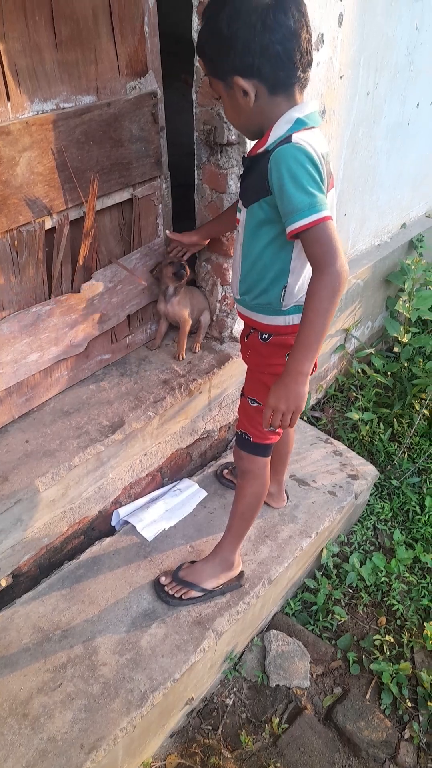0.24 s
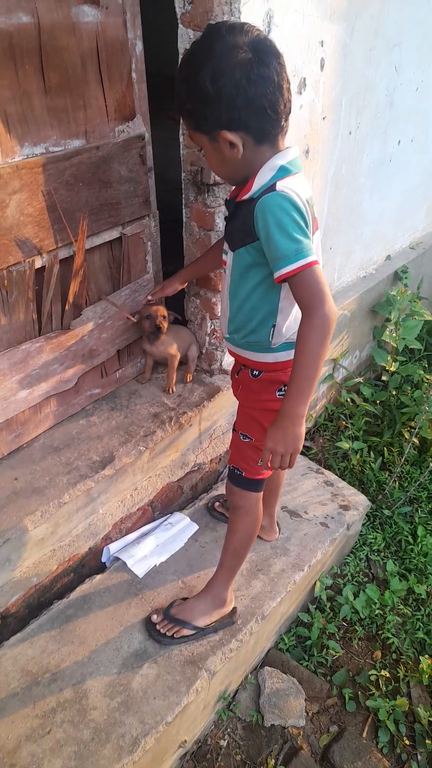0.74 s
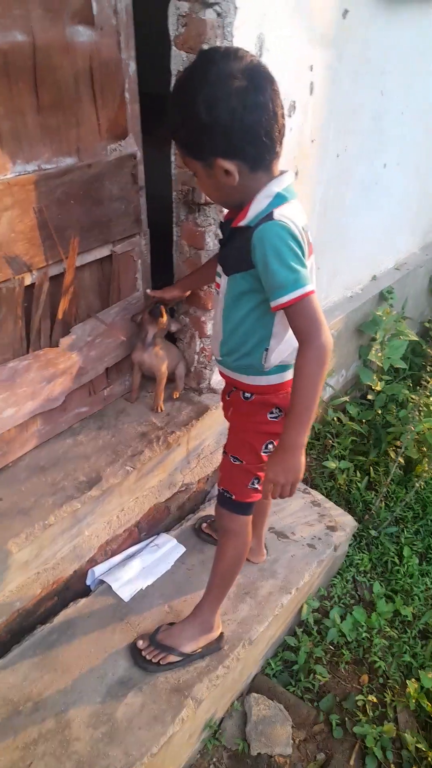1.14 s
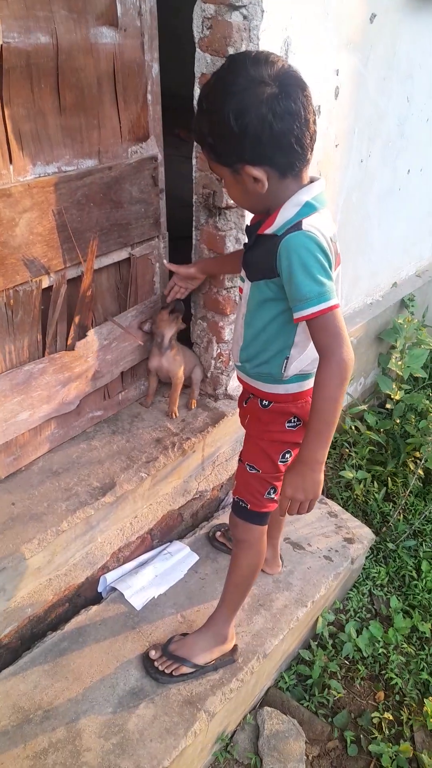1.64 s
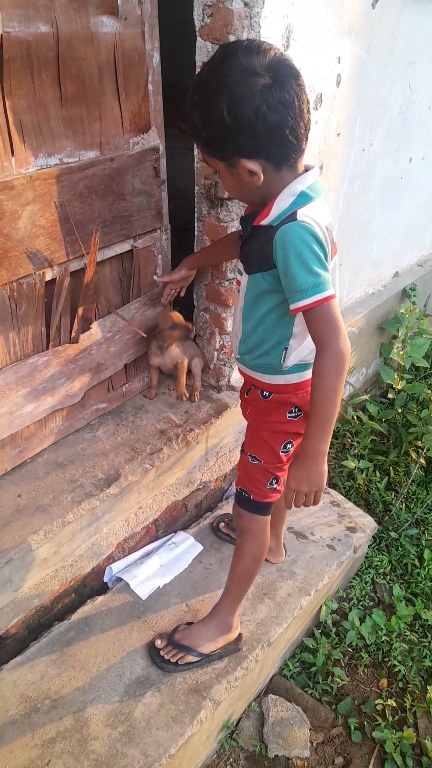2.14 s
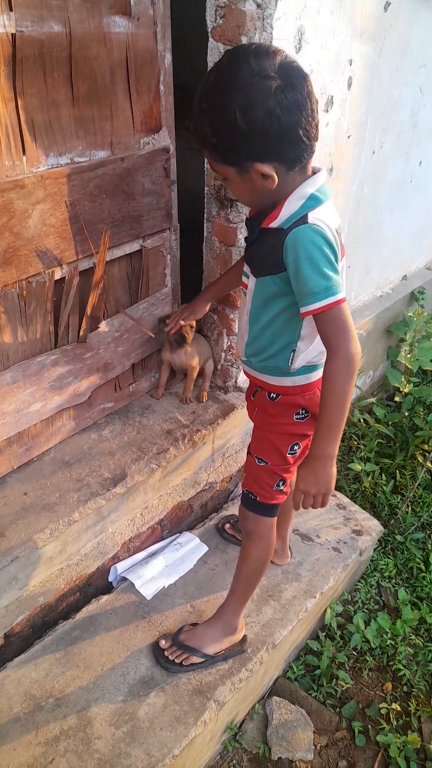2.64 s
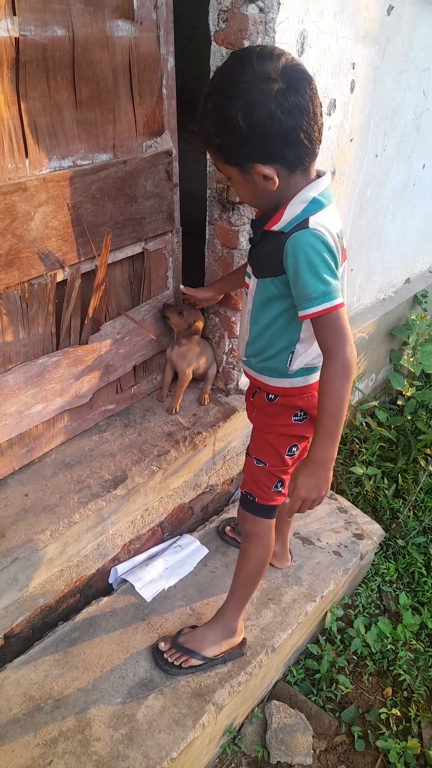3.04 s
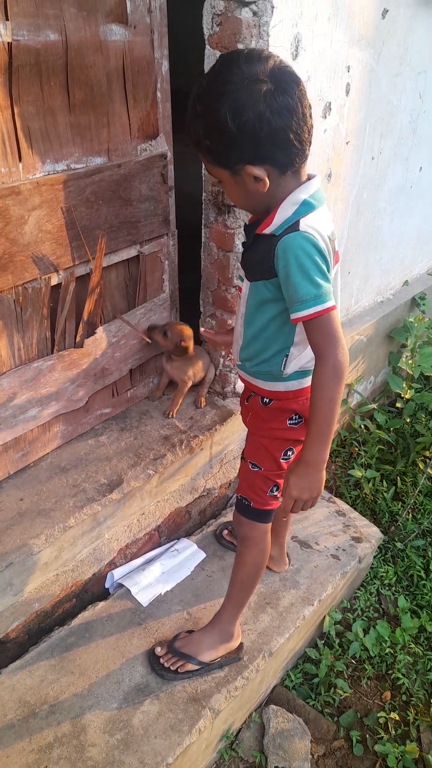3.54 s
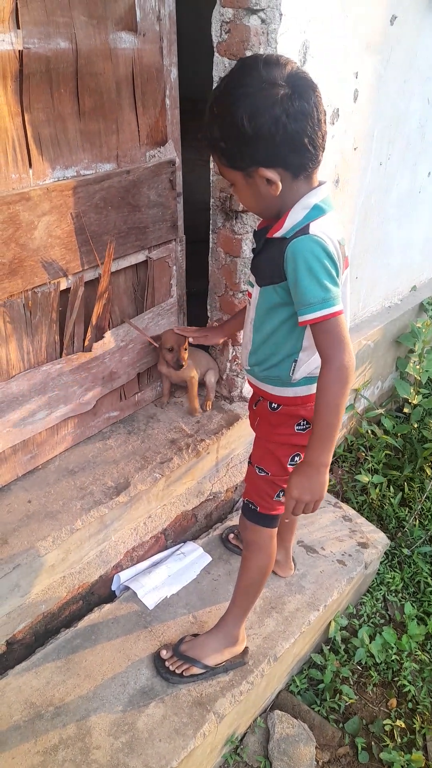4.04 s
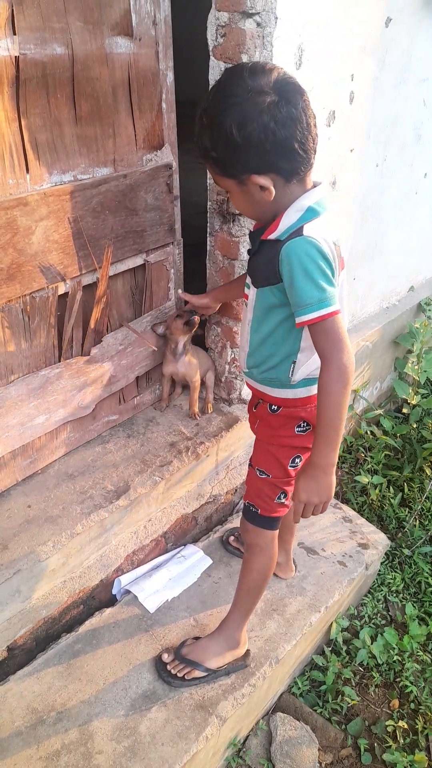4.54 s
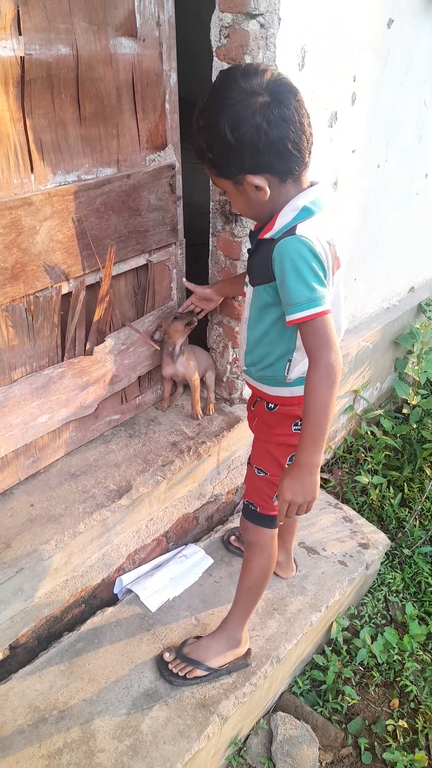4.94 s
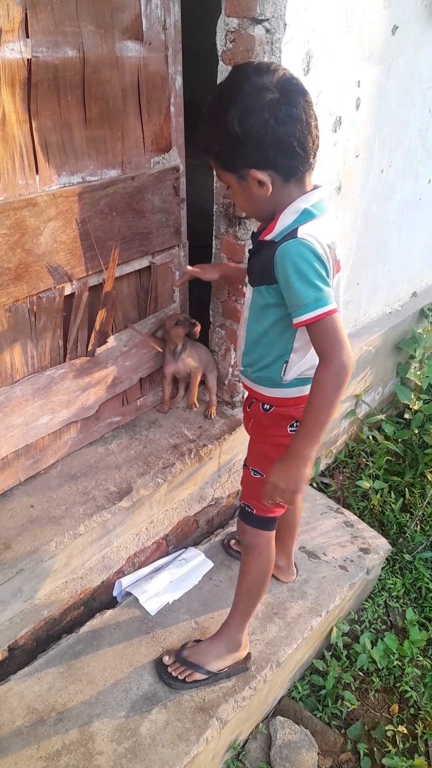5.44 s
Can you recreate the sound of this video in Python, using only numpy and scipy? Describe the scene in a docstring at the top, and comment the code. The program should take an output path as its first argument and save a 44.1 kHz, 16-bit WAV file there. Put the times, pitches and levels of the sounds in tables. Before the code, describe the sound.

Outdoors by a house doorway, about five and a half seconds. Throughout, high insects buzz and trill finely over a soft low rumble and a faint, distant, wavering drone. Within the first second come tiny, weak puppy squeaks and harsh bird chatter at a distance; quick falling chips follow between about 1.6 and 3 seconds. From 1 second the puppy whimpers regularly, each cry a thin, whistle-like whine of about a tenth of a second, bending up or down, gradually stronger. Clear, quick bird whistles sound from 3.4 to 4.2 seconds. At 4.2 the puppy gives its loudest, piercing yelp, with a hoarse catch; a short whine at 4.5 breaks into a throaty, uneven rasp until 4.8. A rising whine comes at 5, a rattling screech at 5.3, and a last strong whine near 5.55, cut off by the end. Cries and birds ring briefly off wall and doorway.

```python
"""From the start, insects buzz and trill and a faint far drone wavers over a low rumble: pulsed and shaped noise, slow tones.
Small birds soon chatter and chip as gliding tones; clear whistles join in the second half.
A small puppy then whimpers on the doorstep of a house: thin, growing cries built from partials of a gliding pitch.
Late on, one cry breaks into a rasp of uneven pulses through throat resonances, and a later one into a rattling screech.
Wall and doorway give cries and birds a short ring of decaying noise."""
import sys
import numpy as np
from scipy import signal
from scipy.fft import rfft, irfft
from scipy.io import wavfile

SR = 44100
rng = np.random.default_rng(int(sys.argv[2]) if len(sys.argv) > 2 else 0)


def waveform_to_disk(signal):
    """Save audio, clipped to [-1, 1], as 16-bit WAV at the path in sys.argv[1]."""
    frames = np.transpose(np.atleast_2d(signal))
    scaled = np.clip(frames, -1, 1) * 32767
    samples = np.round(scaled).astype(np.int16)
    wavfile.write(sys.argv[1], SR, samples)


N = 250929
TIME = np.arange(N) / SR
FREQS = np.fft.rfftfreq(N, 1 / SR) + 1e-3   # the offset keeps the logarithm finite at 0 Hz

# Outdoor rumble: (frequency [Hz], density [dB per Hz, relative])
RUMBLE_SPECTRUM = [(10, -42), (25, -24), (50, -3.5), (100, 1), (170, -5), (260, -3), (400, -18.5),
                   (540, -22), (680, -22), (900, -21.5), (1150, -21), (1400, -24.5), (1800, -35),
                   (2700, -34), (3300, -44), (6000, -80)]
RUMBLE_DB = -58.5
# Far drone, pitch: (time [s], frequency [Hz])
DRONE_PITCH = [(0, 132), (1.1, 132.4), (3.9, 141.1), (5.4, 121.9)]
# Far drone: (time [s], level [dB, before a 1.6 dB lift])
DRONE_LEVEL = [(0.0, -60), (1.06, -51.5), (1.79, -61), (2.48, -49.5), (2.71, -64), (2.82, -54),
               (3.24, -67.5), (3.88, -55.5), (4.4, -63.5), (5.6, -64.5)]
# Coherence of diffuse sound at the two ears: (frequency [Hz], left-right likeness [0-1])
EAR_LIKENESS = [(60, 0.98), (250, 0.92), (600, 0.29), (2000, 0.38), (6000, 0.069), (12000, 0.11)]
# Near insects: (time [s], buzz rate [pulses per s], buzz level [dB], trill level [dB, before a 4 dB cut])
INSECTS = [(0, 114, -101, -58), (.4, 88, -67, -58.5), (1.2, 375, -61, -57.5), (2.2, 118, -59, -56.5),
           (3, 140, -62.5, -55), (5.69, 286, -59, -54.5)]
# Distant insects: (frequency [Hz], density [dB per Hz, relative])
CHORUS_SPECTRUM = [(3400, -25.5), (4000, -11), (4700, -6.5), (5300, 0), (6200, 3.5), (6800, -20.5),
                   (7600, 0.5), (8600, 3), (9500, -6), (10700, -18.5), (11400, -14.5), (11800, -20),
                   (15700, -23.5)]
# Distant insects: (time [s], level [dB, before a 1.5 dB cut])
CHORUS_LEVEL = [(0, -58.5), (.4, -57), (1, -55), (3, -54.5), (4.3, -52), (5.69, -56)]
# Hoarse catches in the cries: (centre time [s], length [s], level [dB], throaty share [0-1])
CATCHES = [(.01, 0.056, -49, .5), (0.53, 0.043, -49, 0.56), (1.553, 0.029, -52, 0.23),
           (2.851, 0.013, -50, 0.8), (3.082, 0.016, -49.5, 0.86), (3.17, 0.18, -56.5, 0.87),
           (3.782, 0.16, -66, 0), (4.065, 0.027, -56.5, .2), (4.282, 0.09, -50, 0),
           (4.365, 0.018, -33.5, 0.6), (5.326, 0.046, -32, .05), (5.406, 0.033, -42.5, 0.4)]
# Colour of the thin hoarseness: (frequency [Hz], gain [dB])
HOARSE_SPECTRUM = [(300, -17), (800, -41), (1200, -14.5), (1700, -2), (2500, -13), (3200, -19),
                   (4300, -9.5), (5500, -40), (7200, -14.5), (9500, -30.5), (13000, -16.5), (16000, -54)]
# Throat resonances: (centre [Hz], width [Hz, before widening by 2.04],
# level with mouth nearly shut [dB], level with mouth open [dB])
THROAT = [(583, 75, 4, -14.5), (702, 180, 0, 0), (1133, 82, -3, 0.5), (1682, 160, -19, -2.5),
          (3100, 91, -18, -24), (4970, 250, -13.5, -11), (7160, 710, -8.5, -3.5), (14700, 1600, -18, -14)]
# Harsh chatter of birds further off:
# (time [s], length [s], start [Hz], middle [Hz], end [Hz], level [dB])
CHATTER = [(.33, 0.12, 2900, 2990, 2860, -66), (.66, 0.14, 2810, 2920, 2870, -66),
           (.76, .09, 3300, 3140, 2710, -59), (.87, 0.26, 3000, 2623, 2860, -54),
           (.97, 0.11, 2700, 3880, 4230, -55.5), (1.07, 0.1, 3000, 3920, 4490, -49.5),
           (1.35, 0.3, 3150, 2665, 2490, -59), (2.88, 0.25, 2700, 2630, 3140, -62.5),
           (2.98, 0.097, 3000, 3900, 4070, -56.5), (3.07, 0.1, 3200, 3810, 4300, -52),
           (3.25, 0.12, 3900, 3700, 3310, -61.5), (4.43, 0.087, 2700, 3410, 4500, -55),
           (4.53, 0.087, 3200, 3770, 4400, -53)]
# Runs of tiny falling chips, in pairs: (start [s], end [s], time between pairs [s], level [dB])
TWITTER = [(0.356, .75, 0.084, -58.5), (1.621, 2.33, 0.098, -57.5), (2.382, 2.62, .102, -52.5),
           (2.708, 3, .122, -53)]
# Clear bird whistles: (time [s], length [s], start [Hz], middle [Hz], end [Hz], level [dB])
WHISTLES = [(3.432, 0.088, 5700, 4590, 3690, -39.5), (3.606, 0.069, 3070, 4094, 3670, -40),
            (3.675, .11, 3036, 3053, 3010, -52), (3.725, 0.071, 5600, 5430, 4330, -40.5),
            (3.836, 0.073, 5780, 4270, 2660, -38.5), (3.985, 0.046, 5700, 4450, 2870, -39),
            (4.05, 0.053, 3100, 4200, 4320, -41.5), (4.136, 0.07, 3080, 3720, 2680, -43)]
# Cries; a jump of register starts a new row: (time [s], length [s], pitch turn after start [s],
# start pitch [Hz], turning pitch [Hz], end pitch [Hz], loudest moment after start [s],
# level [dB, before a 2 dB lift], swell [dB], fade [dB], then against the fundamental:
# second partial [dB], third partial [dB], upper partials [dB], extra sheen at the very top [dB])
CRIES = [(0.465, 0.041, 0.041, 718, 669, 670, 0.07, -51.5, 8, 8, -14, -21.6, -39, 0.0),
         (0.508, 0.11, 0.028, 614, 1051, 1196, 0.038, -52, -0.5, -7, -20, -40, -24.5, 16),
         (0.62, 0.04, 0.014, 1090, 1342, 1355, 0.026, -46, 10, 12, -24, -18.9, -18.9, 8),
         (0.996, 0.13, 0.1, 1160, 1050.0, 1033, 0.043, -43, 12, 5.5, -25, -25, -16, -14),
         (1.424, 0.14, 0.073, 975, 1127, 1083, 0.13, -38, 18.5, 10.5, -13.5, -29, -12, -7),
         (1.856, 0.15, 0.026, 1222, 1331, 1409, 0.19, -39.5, 10.5, 4.5, -23, -12, -3, -17),
         (2.166, 0.1, 0.0037, 1567, 1693, 1445, 0.097, -35, 14, 20, -25.5, -12, -12, -7),
         (2.462, 0.099, 0.0086, 1488, 1574, 1338, 0.083, -37, 11, 8.5, -26.5, -10, -7.5, -4.5),
         (2.733, 0.13, 0.016, 1367, 1260, 983, 0.11, -43, 10, 11, -17.8, -23.5, -8.5, -5),
         (3.038, 0.041, 0.033, 1221.0, 1360, 1510, 0.047, -42, 17, 20, -21, -13, -18, -9.0),
         (3.087, 0.11, 0.097, 1074, 1038, 1035, 0.024, -41.5, 3, 3.5, -20, -22.5, -17, -21),
         (3.357, 0.12, 0.055, 1243, 1406, 1417, 0.078, -37.5, 16.5, 0, -23, -7.5, -16.5, 5.5),
         (3.647, 0.119, 0.039, 1280, 1380, 1029, 0.061, -38, 13.5, 10.5, -21, -17, -9, -1.5),
         (3.926, 0.13, 0.047, 1318, 1501, 1265, 0.073, -35.5, 14, 6.5, -20, -2.1, -5, -7.5),
         (4.212, 0.15, 0.059, 1241, 1555, 1230, 0.053, -21, 23.5, 16, -22.5, -12, -10, -3),
         (4.505, 0.078, 0.07, 1150, 1105, 1140, 0.071, -36.5, 12.5, 18, -28.0, -19, -15, 3),
         (4.955, 0.17, 0.17, 1130, 1409, 1380, 0.13, -37.5, 8.5, -0.5, -23, -21, -7, -16.0),
         (5.268, 0.033, 0.021, 1480.0, 1636, 1560.0, 0.034, -39.0, 12, 16, -15, -6, -6, -5),
         (5.305, 0.113, 0.0353, 1600, 1741, 1482, 0.012, -29, -1, 6.5, -28.0, -9, -15.0, 6),
         (5.545, 0.18, 0.095, 1249, 1562, 1626, 0.066, -29.5, 18.5, 0, -22.5, -24.5, -13, -3)]
# Colour of the partials above the third: (frequency [Hz], gain [dB])
OVERTONES = [(3500, 10.5), (5000, -3.5), (6200, -6.5), (7400, -0.5), (8500, -21.5), (10500, -11),
             (12500, -14), (14000, -9.5), (16000, -19)]
# The voice breaks into uneven slaps: (time [s], level [dB], rate [slaps per s], mouth opening [0-1])
RASP = [(4.58, -69, 256, 0), (4.588, -37, 270, 0.5), (4.63, -32.5, 327, 0.17), (4.68, -30.5, 330, 0.34),
        (4.72, -29.5, 250, 0.93), (4.752, -29, 220, 0.95), (4.768, -49, 220, 0.95), (4.79, -41, 420, 0.3)]
# Rattle of the screech: (time [s], depth [0-1], rate [rattles per s])
SCREECH = [(5.3, 0.05, 150), (5.308, 0.87, 135), (5.336, 0.38, 197), (5.352, 0, 110)]
# Step and wall colour each ear differently:
# (frequency [Hz], left-right level [dB], left lead [radians])
EAR_COLOUR = [(503, -10.5, -3.4), (755, -2.5, 2.9), (1175, 5.5, -1.77), (1183, -3.5, -2.1),
              (1280, -2, -1.39), (1490, -10, -1.1), (1510, -3.5, -0.34), (2180, -4, 2.07), (4470, -9, 1.72),
              (8900, -4.5, 1.89)]

RISE_CURVE, FALL_CURVE = 2, 1.4   # exponents that round the pitch on either side of its turn
SWELL_CURVE, FADE_CURVE = 1.4, 1.05   # exponents on either side of the loudest moment
DROP_SHARE, DROP_S = 0.1174, 0.00708   # the pitch collapses as the air runs out
QUAVER_SHARE, QUAVER_HZ = 0.0054, 29.5   # slow unsteadiness of the pitch
# A resonance that the second partial of the low cries sweeps through
NASAL_HZ, NASAL_WIDTH_HZ, NASAL_DB = 1882, 340, 13
BRIGHT_PER_EFFORT = 0.19   # dB that the overtones gain for each dB of effort
DULL_DB_PER_OCTAVE = 14.5   # overtones dull as the folds slacken
CUTOFF_HZ = 15650


def from_db(db):
    """Logarithmic level: decibels become an amplitude gain."""
    return 10 ** (np.asarray(db) / 20)


def rms_one(x):
    """Power normalisation: scale to unit rms."""
    return x / np.sqrt(np.mean(x ** 2) + 1e-20)


def in_time(rows, t=TIME):
    """Linear interpolation: read a table's columns along its first column at t."""
    s, *columns = np.transpose(rows)
    return [np.interp(t, s, column) for column in columns]


def at_hz(points, hz):
    """Logarithmic frequency scale: interpolate a spectrum evenly per octave."""
    point_hz, value = np.array(points).T
    return np.interp(np.log(hz), np.log(point_hz), value)


def wander(rate_hz, size=N):
    """Low-passed noise: a smooth random fluctuation of unit rms."""
    hz = np.fft.rfftfreq(size, 1 / SR)
    spectrum = rfft(rng.standard_normal(size)) / (1 + (hz / rate_hz) ** 4)
    return rms_one(irfft(spectrum, size))


def turns(hz):
    """Phase accumulation: the integral of a moving frequency, in radians."""
    return 2 * np.pi * np.cumsum(hz) / SR


def resonate(x, hz, width):
    """Damped resonance: two equal two-pole sections in series give steep skirts."""
    r = np.exp(-np.pi * width / SR)
    section = [(1 - r * r) / 2, 0, (r * r - 1) / 2, 1, -2 * r * np.cos(2 * np.pi * hz / SR), r * r]
    return signal.sosfilt([section, section], x + 1e-18)


def pan(x, left_db):
    """Interaural level difference: place a source between left and right."""
    return x * from_db([[left_db / 2], [-left_db / 2]])


def airy_noise(spectrum):
    """Diffuse-field coherence: coloured noise, most alike at the two ears in the bass."""
    mid, side = rfft(rng.standard_normal((2, N)))
    alike = np.clip(at_hz(EAR_LIKENESS, FREQS), 0, 1)
    both = np.sqrt(1 + alike) * mid + np.sqrt(1 - alike) * side * [[1], [-1]]
    return rms_one(irfft(both * from_db(at_hz(spectrum, FREQS)), N))


def background():
    """Superposition: low broadband rumble, a wavering far drone and a faint hum."""
    (hz,), (db,) = in_time(DRONE_PITCH), in_time(DRONE_LEVEL)
    waver_db = 1.5 * wander(3)
    drone = from_db(db + 1.6 + waver_db) * np.sin(turns(hz + 2 * wander(7.2)))
    hum = from_db(-60.0 + 4.1 * wander(5.0)) * np.sin(turns(59 + 2 * wander(6.8)))
    rumble = from_db(RUMBLE_DB) * airy_noise(RUMBLE_SPECTRUM)
    return pan(rumble + drone + hum, left_db=-4.5)


def wings(rate, hz, width, depth):
    """Stridulation: each stroke rasps a resonant patch of wing, pulsing its noise."""
    strokes = np.exp(depth * np.cos(turns(rate)))
    patch = resonate(rng.standard_normal((2, N)), hz, width)
    return rms_one(patch * strokes)


def insects():
    """Amplitude modulation: one high buzz and two lower, unequal trills over a distant chorus."""
    per_s, buzz_db, trill_db = in_time(INSECTS)
    buzz = wings(per_s, hz=9240, width=400, depth=.9)
    slow_trill = wings(53.5 + wander(1.5), hz=5680, width=450, depth=1)
    fast_trill = wings(69 + 2 * wander(1.5), hz=6130, width=330, depth=1)
    trills = slow_trill + 0.49 * fast_trill
    near = from_db(buzz_db) * buzz + from_db(trill_db - 4) * trills
    chorus_db = in_time(CHORUS_LEVEL)[0] - 1.5
    chorus = from_db(chorus_db) * airy_noise(CHORUS_SPECTRUM)
    return pan(near, left_db=-5.0) + pan(chorus, left_db=-3.0)


def slaps(per_s, uneven, breath):
    """Glottal excitation: folds slap shut unevenly, each time with a puff of turbulent air."""
    phase = turns(per_s * (1 + uneven * wander(150)))
    closures = np.diff(np.floor(phase / (2 * np.pi)), prepend=0)
    pulses = closures * from_db(1 * wander(133))
    puffs = rng.standard_normal(N) * (1 + np.cos(phase))
    return rms_one(pulses) + breath * rms_one(puffs)


def throat(source, opening):
    """Source-filter principle: parallel throat resonances, reweighted as the mouth opens."""
    resonances = 0
    for hz, width, shut_db, open_db in THROAT:
        level_db = shut_db + (open_db - shut_db) * opening
        resonances = resonances + rms_one(resonate(source, hz, 2.04 * width)) * from_db(level_db)
    return rms_one(resonances)


def catches(opening=0.99):
    """Irregular phonation: brief rattling hoarseness, thin or throaty, under bell-shaped envelopes."""
    source = slaps(np.full(N, 185.), uneven=0.12, breath=1.6)
    thin = rms_one(irfft(rfft(source) * from_db(at_hz(HOARSE_SPECTRUM, FREQS)), N))
    deep = throat(source, opening)
    out = np.zeros(N)
    for centre, length, db, share in CATCHES:
        bell = np.exp(-(2 * (TIME - centre) / length) ** 2)
        out += from_db(db) * bell * ((1 - share) * thin + share * deep)
    return out


def chirps(rows, harsh):
    """Frequency modulation: each note glides along a parabola; harsh notes waver fast and wide."""
    out = np.zeros(N)
    for s, length, first, middle, last, db in rows:
        at = np.flatnonzero((TIME >= s) & (TIME < s + length))
        u = np.linspace(0, 1, len(at))
        hz = np.polyval(np.polyfit([0, .5, 1], [first, middle, last], 2), u)
        envelope = np.abs(np.sin(np.pi * u)) ** 1.07
        tone = np.sin(turns(hz * (1 + harsh * wander(515, size=len(at)))))
        out[at] += from_db(db) * np.sqrt(2) * envelope * tone
    return out


def birds(chip_hz=4900, chip_s=.03, pair_gap_s=0.026):
    """Gliding tones: harsh chatter, runs of paired falling chips and clear whistles."""
    chips = []
    for first, last, every, db in TWITTER:
        for s in np.arange(first, last, every):
            for late in (-pair_gap_s / 2, pair_gap_s / 2):
                start = s + late - chip_s / 2
                chips.append((start, chip_s, 1.1 * chip_hz, chip_hz, 0.904 * chip_hz, db))
    chatter = chirps(CHATTER, harsh=.045)
    twitter = chirps(chips, harsh=0.037)
    whistles = chirps(WHISTLES, harsh=.008)
    return chatter + twitter + whistles


def arch(t, length, crest_s, start_hz, crest_hz, end_hz):
    """Pitch glide: from the start to a turning point, on to the end, with a quick final collapse."""
    crest_s = np.clip(crest_s, .02 * length, .95 * length)
    rise = np.clip(1 - t / crest_s, 0, 1) ** RISE_CURVE
    fall = np.clip((t - crest_s) / (length - crest_s), 0, 1) ** FALL_CURVE
    collapse = 1 - DROP_SHARE * np.exp(np.minimum(t - length, 0) / DROP_S)
    return (crest_hz + (start_hz - crest_hz) * rise + (end_hz - crest_hz) * fall) * collapse


def effort(t, length, loudest_s, swell_db, fade_db):
    """Level envelope: swell and fade, in dB against the nominal loudest moment."""
    loudest_s = np.clip(loudest_s, .02 * length, .95 * length)
    swell = np.clip(1 - t / loudest_s, 0, 1)
    fade = np.clip((t - loudest_s) / (length - loudest_s), 0, 1)
    return -swell_db * swell ** SWELL_CURVE - fade_db * fade ** FADE_CURVE


def whimper(cry, shimmer_db=1.41, edge_s=.003, breath_db=-14):
    """Harmonic synthesis: a nearly pure whistle of the vocal folds, unsteady overtones, a little hiss."""
    (start, length, crest_s, start_hz, crest_hz, end_hz, loudest_s, level_db, swell_db, fade_db,
     second_db, third_db, upper_db, sheen_db) = cry
    at = np.flatnonzero((TIME > start - edge_s) & (TIME < start + length + edge_s))
    t = TIME[at] - start
    size = len(t)
    pitch = arch(t, length, crest_s, start_hz, crest_hz, end_hz)
    effort_db = effort(t, length, loudest_s, swell_db, fade_db)
    jitter = .0025 * wander(160, size)
    quaver = QUAVER_SHARE * wander(QUAVER_HZ, size)
    phase = turns(pitch * (1 + jitter + quaver))
    bright_db = BRIGHT_PER_EFFORT * effort_db + DULL_DB_PER_OCTAVE * np.log2(pitch / crest_hz)
    nasal_db = NASAL_DB * np.exp(-((2 * pitch - NASAL_HZ) / NASAL_WIDTH_HZ) ** 2)
    low_db = [0, second_db + nasal_db, third_db + bright_db]
    voice = np.zeros(size)
    for k in range(1, 14):
        if k <= len(low_db):
            partial_db = low_db[k - 1]
        else:
            partial_db = upper_db + bright_db + at_hz(OVERTONES, k * pitch)
        sheen = np.interp(k * pitch, [9000, 12000], [0, sheen_db])
        flutter = shimmer_db * np.sqrt(k) * wander(55, size)
        fray = .08 * (k - 1) * wander(300, size)   # random phase, growing with partial number
        gain = np.sqrt(2) * from_db(partial_db + sheen + flutter)
        voice += gain * np.sin(k * phase + fray) * (k * pitch < SR / 2)
    hiss = rms_one(resonate(rng.standard_normal(size), 15000, 4400))
    voice += hiss * from_db(upper_db + bright_db + sheen_db + breath_db)
    edges = np.clip((np.minimum(t, length - t) + edge_s) / (2 * edge_s), 0, 1)
    out = np.zeros(N)
    out[at] = voice * edges * from_db(level_db + effort_db)
    return out


def rasp(lurch_db=1.5, lurch_hz=110):
    """Aperiodic excitation: a harsh snarl of uneven slaps in lurches, filtered by the throat."""
    level_db, per_s, opening = in_time(RASP)
    source = slaps(per_s, uneven=.07, breath=.45)
    lurches = rms_one(from_db(lurch_db * wander(lurch_hz)))
    sounding = (TIME > RASP[0][0]) * (TIME < RASP[-1][0])
    return throat(source * lurches, opening) * from_db(level_db) * sounding


def screech(uneven=0.1246):
    """Amplitude modulation: the folds rattle and chop tone and hoarseness alike; returns a gain."""
    depth, per_s = in_time(SCREECH)
    depth = depth * (TIME > SCREECH[0][0]) * (TIME < SCREECH[-1][0])
    return 1 + depth * np.cos(turns(per_s * (1 + uneven * wander(96))))


def doorway(x, near_db, tail_db, near_t60=.14, tail_t60=.9, dull_hz=3500):
    """Reverberation by convolution: quick scatter off the house front and a faint longer ring."""
    t = TIME[:SR]
    near, tail = rng.standard_normal((2, 2, SR)) * (t > .002)
    near = near * from_db(-60 * t / near_t60)
    dulling = signal.butter(1, dull_hz, fs=SR, output="sos")
    tail = signal.sosfilt(dulling, tail * from_db(-60 * t / tail_t60))
    response = (from_db(near_db) * rms_one(near) + from_db(tail_db) * rms_one(tail)) / np.sqrt(SR)
    response[:, 0] += 1   # direct sound
    response = rms_one(response) / np.sqrt(response.shape[1])   # unit energy
    return signal.fftconvolve(x[None], response, axes=1)[:, :N]


def on_the_step(x):
    """Interference: close reflections tip level and phase between the ears as the pitch moves."""
    left_db, lead = in_time(EAR_COLOUR, FREQS)
    gains = from_db([left_db / 2, -left_db / 2])
    gains = gains / np.sqrt(np.mean(gains ** 2, axis=0))
    phase_shift = np.exp(.5j * lead * np.array([[1], [-1]]))
    shaped = irfft(rfft(x) * gains * phase_shift, N)
    return shaped * np.clip(TIME / .005, 0, 1)   # short fade-in


def scene():
    """Superposition of sources: the puppy by the door, the garden all around."""
    cries = from_db(2.0) * sum(whimper(cry) for cry in CRIES)
    voice = (cries + catches()) * screech() + rasp()
    puppy = on_the_step(doorway(voice, near_db=-5.0, tail_db=-22.5))
    garden = doorway(birds(), near_db=-5, tail_db=-11)
    return puppy + pan(garden, left_db=-3.5) + insects() + background()


def record(dry):
    """Band limitation: a steep elliptic low-pass cuts the top."""
    return signal.sosfilt(signal.ellip(12, .1, 80, CUTOFF_HZ, fs=SR, output="sos"), dry)


dry = scene()
out = record(dry)
waveform_to_disk(out)
```